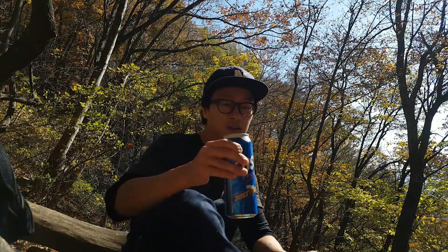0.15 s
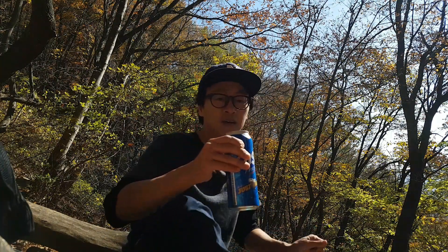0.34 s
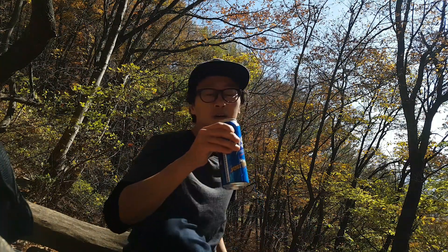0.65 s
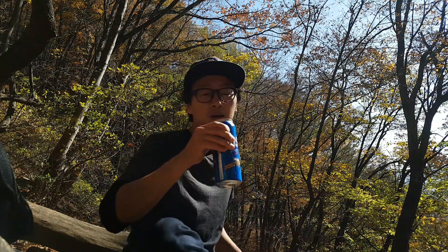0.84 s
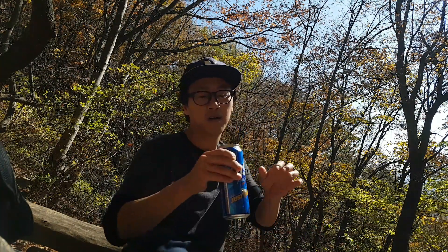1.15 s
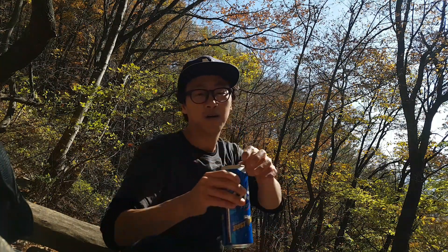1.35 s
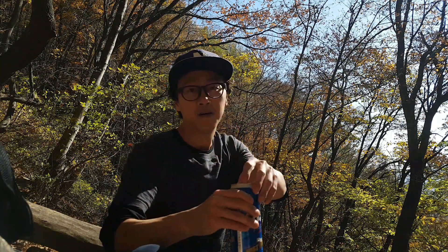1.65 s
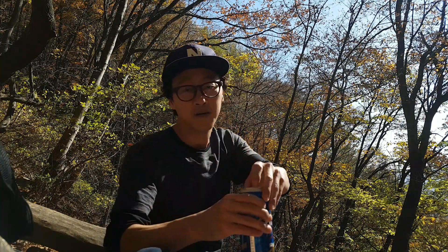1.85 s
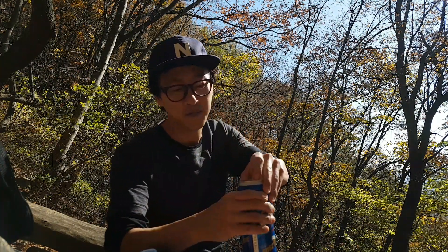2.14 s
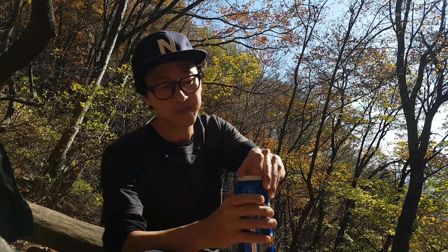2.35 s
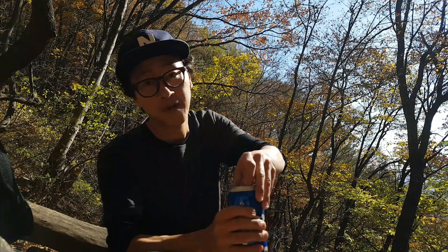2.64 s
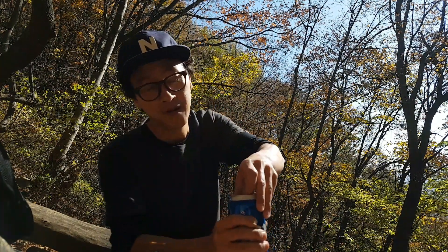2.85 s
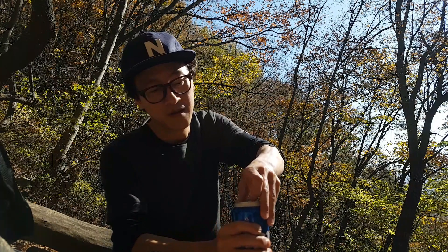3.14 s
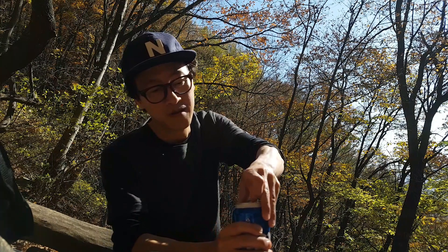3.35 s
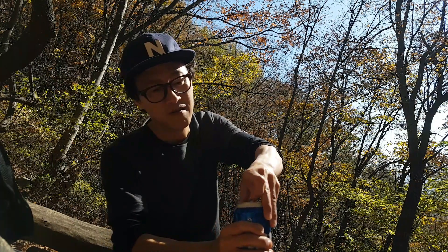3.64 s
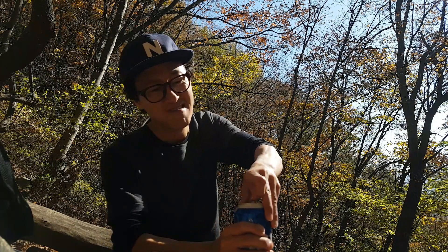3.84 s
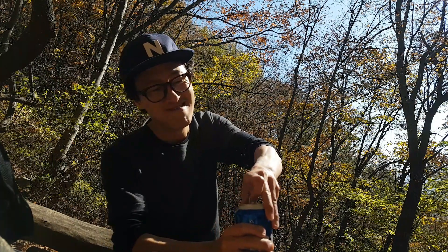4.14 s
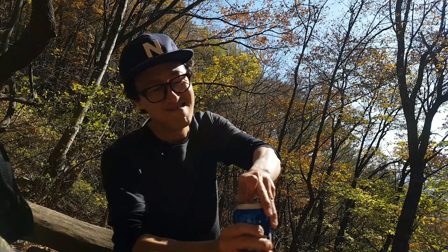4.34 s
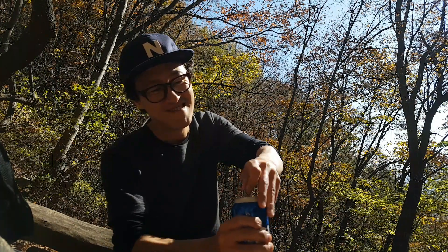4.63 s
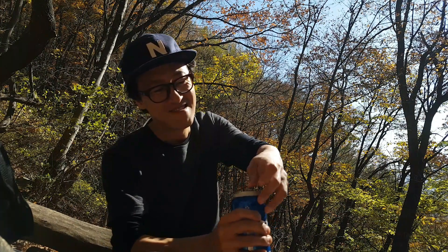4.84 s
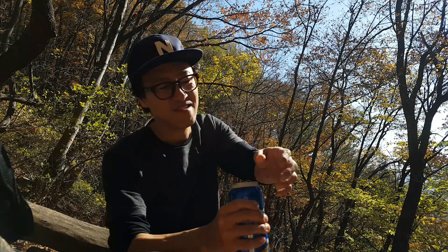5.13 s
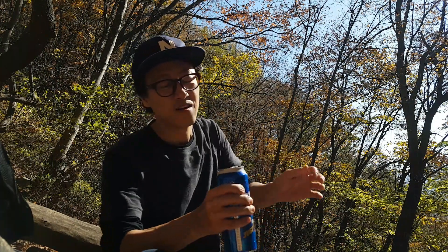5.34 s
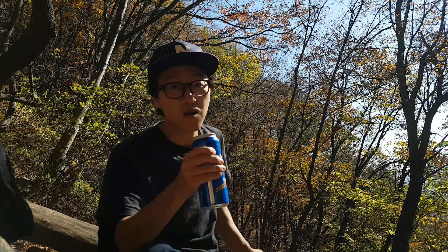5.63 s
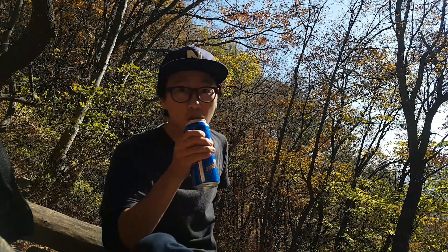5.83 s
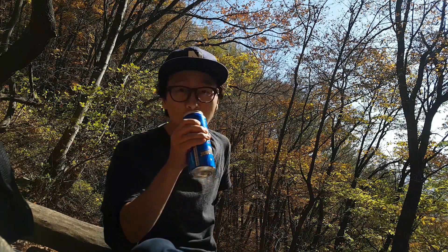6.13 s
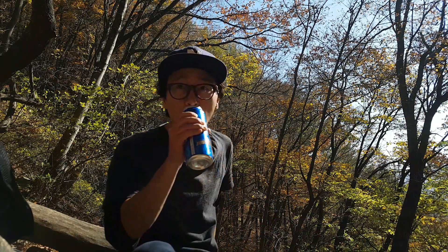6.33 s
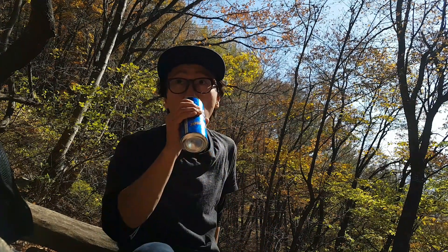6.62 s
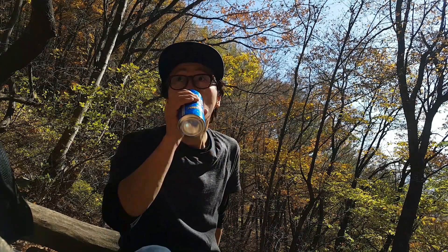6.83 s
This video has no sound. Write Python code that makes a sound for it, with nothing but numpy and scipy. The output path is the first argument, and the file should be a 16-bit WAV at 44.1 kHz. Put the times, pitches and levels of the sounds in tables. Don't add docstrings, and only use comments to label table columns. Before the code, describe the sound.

Close in quiet woods, dry leaves and cloth rustle with small twiggy ticks. Near three seconds a can tab snaps brightly, then snaps again; the seal cracks hard with a spit of gas and the lid folds in almost at once. A short soft hiss fades. Afterward the faint wind and rustle drop in level, then slowly creep back as the recorder recovers.

```python
import sys
import numpy as np
from scipy import signal
from scipy.fft import rfft, irfft, next_fast_len
from scipy.io import wavfile
from scipy.ndimage import uniform_filter1d

SR = 44100
rng = np.random.default_rng(int(sys.argv[2]) if len(sys.argv) > 2 else 0)


def volts(x):
    e = np.asarray(x, float) / 20
    return 10 ** e


def generate_wav(signal):
    frames = np.transpose(np.atleast_2d(signal))
    scaled = np.clip(frames, -1, 1) * 32767
    pcm = np.round(scaled).astype(np.int16)
    wavfile.write(sys.argv[1], SR, pcm)


N = 307850

# frequency [Hz], density [dB per Hz].
BRIGHT_SPECTRUM = [(2940, -30), (5000, -4.5), (5960, -8), (6920, -9.5), (11200, 0.5), (15500, -10.5),
                   (16300, -19), (16500, -59.5)]


def evened(x):
    return x / np.sqrt(np.mean(x ** 2) + 1e-20)


def read(points, hz):
    f, value = np.transpose(points)
    return np.interp(np.log(hz + 1), np.log(f + 1), value)


def add(mix, start_s, sound):
    part = mix[:, round(start_s * SR):][:, :sound.shape[1]]
    part += sound[:, :part.shape[1]]


def coloured(x, points):
    size = next_fast_len(x.shape[1])
    gain = volts(read(points, np.fft.rfftfreq(size, 1 / SR)))
    return evened(irfft(rfft(x, size) * gain, size)[:, :x.shape[1]])


def pair(size, same):
    a, b = rng.standard_normal((2, size))
    same = np.clip(same, 0, 1)
    return np.array([a, same * a + np.sqrt(1 - same ** 2) * b])


def drift(size):
    return evened(uniform_filter1d(uniform_filter1d(rng.standard_normal(N), size), size))


def steep(x, hz, kind):
    return signal.sosfilt(signal.butter(4, hz, kind, fs=SR, output="sos"), x)


def below(x, hz):
    return signal.oaconvolve(x, signal.firwin(255, hz, window=("kaiser", 8), fs=SR)[None], "same")


def recorder_gain():
    # start [s], change [dB], time constant [s].
    ducks = [
        (3.3, -1.5, 0.059),
        (3.97, -1.5, 0.086),
        (4.17, -11, .008),
        (4.19, -10.5, 0.75),
    ]
    rest_db, hold_until_s = 1.18, 4.79
    quick_back_db, quick_back_s, creep_db_per_s = 8, 0.27, 2.1
    t = np.arange(N) / SR
    down_db = sum(db * (1 - np.exp(-np.maximum(t - s, 0) / lag_s)) for s, db, lag_s in ducks)
    free_s = np.maximum(t - hold_until_s, 0)
    back_db = quick_back_db * (1 - np.exp(-free_s / quick_back_s)) + creep_db_per_s * free_s
    return volts(rest_db + down_db + back_db)


def can():
    # frequency [Hz], width [Hz], level [dB].
    lid_shut = [(660, 120, -14), (1306, 124, -3.5), (1500, 120, -0.5), (2000, 350, -14.5),
                (2420, 180, -5.5), (2850, 47, 8), (3830, 30, -3), (4160, 120, -9), (5170, 180, -9.5),
                (6730, 170, -14), (9500, 810, -32)]
    lid_pried = [(610, 120, -17), (1242, 140, -20.5), (1740, 90.7, 5.5), (2120, 220, -19),
                 (2610, 140, -30.5), (3400, 83, -18), (3980, 1400, -24.5), (5200, 150, -14.5),
                 (6150, 300, -19), (8310, 440, -30), (10216, 500, -30), (11400, 360, -37.5)]
    lid_split = [(1245, 110, -19), (1600, 230, 1), (1830, 67, 6.5), (2170, 98, 3), (3300, 200, -6),
                 (4000, 130, -3.5), (4403, 170, 1.5), (5200, 180, 0), (7170, 1400, 0), (8450, 170, -3),
                 (10060, 250, 0), (11000, 170, -7), (14700, 890, -4)]
    lid_open = [(650, 51, -7), (1730, 340, -9.5), (2200, 200, -12.5), (2622, 82, -7), (2960, 243, -5),
                (3447, 250, 3.5), (4450, 260, -8.5), (5230, 220, -5.5), (8350, 170, -6.5), (9600, 660, -9),
                (13300, 390, -11)]
    lid_states = [lid_shut, lid_pried, lid_split, lid_open]
    # time [s], ring [dB], crack
    # noise [dB], crack t60 [s].
    blow_states = [
        [(2.957, -61, -38, 0.067), (2.9613, -1.5, -25.5, 0.01), (2.969, -42, -40, 0.027)],
        [(3.3, -71, -40, 0.15), (3.3045, 4.5, -22, 0.029), (3.3051, -30, -15, 0.021), (3.3098, -40, -35, 0.011),
         (3.3135, -21, -35, 0.0092)],
        [(3.9585, -56, -42, 0.018), (3.9609, -7.5, -18.5, 0.013), (3.9627, 1, -9, 0.02),
         (3.9637, -5.5, -17.5, 0.0076), (3.969, -35.5, -28, 0.03)],
        [(4.1785, -63, -43, .03), (4.1807, -25.5, -26, 0.0042), (4.182, 3.5, -17.5, 0.02),
         (4.1834, -28.5, -28, 0.007), (4.1843, -11, -66, 0.0076), (4.19, -56, -40, 0.075)],
    ]
    # frequency [Hz], density [dB per Hz].
    crack_spectra = [
        [(240, -43), (400, 8), (2800, -13.5), (3530, -5), (6800, -28), (7580, -11), (16500, -26)],
        [(240, -56), (400, -19), (913, -18), (1780, -4.5), (2840, -26.5), (6290, -18), (16500, -46.5)],
        [(240, -58), (400, -43.5), (1780, 2.5), (2840, -7.5), (5220, -3.5), (5820, -17), (7230, -2.5),
         (15000, -12), (16500, -23.5)],
        [(240, -56.5), (430, -32), (650, -6), (1000, -22), (2800, -6.5), (4130, -16), (5800, -10),
         (11500, -12.5), (16500, -29.5)],
    ]
    # contact [s], time until the thumb damps the lid [s], lid springs out +1 or in -1.
    touches = [
        (.00035, .0065, 1),
        (.0005, .0034, 1),
        (.00014, .006, -1),
        (.0002, .0016, -1),
    ]
    out, t = np.zeros((2, N)), np.arange(3000) / SR - .0005
    after = np.maximum(t, 0)
    for modes, blows, spectrum, (contact_s, damped_s, way) in zip(lid_states, blow_states, crack_spectra, touches):
        hz, width_hz, db = np.transpose(modes)[:, :, None]
        detune = 1 + .014 * np.array([-1, 1])[:, None, None] * rng.choice([-1, 1], hz.shape)
        decay = np.exp(-np.pi * width_hz * .8 * after)
        rings = volts(db) * width_hz * decay * np.cos(2 * np.pi * hz * detune * t)
        rise = np.exp(-(np.minimum(t, 0) / contact_s) ** 2)
        thumb = np.where(hz < 800, 1, .09 + np.exp(-(after / damped_s) ** 4))
        ring = (rings * thumb).sum(axis=1) * rise
        ring = way * ring / abs(ring).max()
        for s, ring_db, crack_db, t60_s in blows:
            crack = coloured(pair(len(t), 0.26), spectrum) * volts(crack_db - 60 * after / t60_s)
            add(out, s, volts(ring_db) * ring + crack * rise)
    return steep(out, 420, "high")


def gas():
    # frequency [Hz], density [dB per Hz].
    sigh_spectrum = [(470, -33.5), (800, -4.5), (1100, -22.5), (1260, -10), (1570, -10.5), (3350, 0.5),
                     (6970, -18.5), (10300, -8.5), (14900, -22), (16500, -33)]
    start_s, level_db, t60_s = 4.186, -48.5, 0.45
    out, t = np.zeros((2, N)), np.arange(SR // 2) / SR
    add(out, start_s, coloured(pair(len(t), 0.382), sigh_spectrum) * volts(level_db - 60 * t / t60_s))
    return out


def tick_rows():
    # time [s], peak [dB], pitch [Hz], bright share
    # [dB].
    creaks = [
        (2.9685, -45, 9050, 8),
        (2.986, -31, 4470, -13),
        (4.1091, -31.5, 2280, 0),
        (4.161, -24.5, 2000, -4.5),
        (4.1617, -29.5, 3400, -6),
        (4.171, -36, 1800, 7),
        (4.19, -26.5, 2200, -8),
        (6.595, -56, 2000, -8),
    ]
    # time [s], peak [dB], pitch [Hz], bright share [dB].
    twigs = [(0.0943, -30, 2000, -15), (0.108, -21.5, 2800, -16), (0.1369, -16, 1500, -13),
             (0.2382, -20.5, 1380, -8), (0.3045, -38, 1310, -13), (0.3413, -40, 1680, 6.5),
             (0.405, -43, 1500, 5), (0.5122, -35.5, 1500, -5), (0.5728, -29, 1600, -12),
             (0.6406, -37, 4540, -2), (0.7543, -34.5, 1850, -4), (1.339, -33, 1930, -18),
             (1.932, -21.5, 3320, -4.5), (2.2247, -32, 2340, -4), (2.242, -38, 1100, -32),
             (2.2436, -24, 1900, -36), (2.2467, -26, 1980, -36), (2.253, -27.5, 1900, -26),
             (2.7819, -37.5, 1180, -21), (2.9163, -34.5, 2290, -0.5), (3.792, -35.5, 3360, -17),
             (4.6837, -58, 2510, -7.5), (4.9988, -53, 2250, -0.5), (5.0196, -53.5, 2850, -18),
             (6.1412, -58, 1470, 7.5), (6.9392, -48.5, 2320, -19)]
    # time [s], peak [dB].
    leaf_ticks = [(0.0278, -42), (0.0514, -36.5), (0.2334, -33), (0.3566, -47), (0.5346, -48), (0.55, -53),
                  (0.4604, -49.5), (0.5924, -47), (0.6809, -41.5), (0.826, -42.5), (0.8714, -50),
                  (0.9854, -49), (1.1894, -51), (1.4474, -57), (1.6357, -40), (1.9144, -45), (1.9374, -40),
                  (3.6494, -56), (4.2794, -68), (5.1944, -63), (5.4094, -64), (6.3744, -74)]
    low_hz, high_hz, leaf_bright_db, spread_db = 1200, 3200, 6, 3.5
    lean_db, scatter_db = -7, 2
    leaves = []
    for s, db in leaf_ticks:
        a, b = rng.random(2)
        leaves.append((s, db, low_hz * (high_hz / low_hz) ** a, leaf_bright_db + spread_db * (2 * b - 1)))
    aside = [(*row, lean_db + scatter_db * rng.uniform(-0.65, 1), 1) for row in twigs + leaves]
    return aside + [(*row, 0, 1.1) for row in creaks]


def ticks():
    knock_cycles = 12
    out, t = np.zeros((2, N)), np.arange(500) / SR
    for s, db, hz, bright_db, pan_db, stretch in tick_rows():
        body = [(hz * .3, -24), (hz * .7, -6), (hz, 0), (hz * 1.5, -7), (hz * 2.4, -20), (SR, -70)]
        age = t / stretch
        knock = np.sin(2 * np.pi * hz * t) * volts(-60 * age * hz / knock_cycles)
        crunch = .45 * coloured(pair(len(t), 1.0), body) * volts(-60 * age / .011)
        snap = coloured(pair(len(t), 0.52), BRIGHT_SPECTRUM) * volts(bright_db - 60 * age / .008)
        level = volts(db + pan_db * np.array([[.5], [-.5]]))
        onset = 1 - np.exp(-t / .0004)
        add(out, s, level * (knock + crunch + snap) * onset)
    return out


def grains(points, lumpy_db, same):
    lumps = evened(uniform_filter1d(rng.standard_normal(N), size=60))
    return evened(coloured(pair(N, same), points) * volts(lumpy_db * lumps))


def rustle():
    # time [s], effort [dB].
    motion = [(0, 9), (.3, -1), (.8, -1.5), (.98, -22), (1.12, 3), (1.27, -4), (1.5, 4), (1.75, -1),
              (1.9, 6), (2.06, 7.5), (2.2, -7), (2.4, 2.5), (2.9, -2.5), (3.2, -5), (3.55, -9.5), (4.1, -8),
              (4.6, -17.5), (6.98, -6)]
    # time [s], rise [s], fall [s], dull level [dB], bright level [dB].
    scuffs = [(0.052, 0.043, 0.03, -44.5, -45.5), (.099, 0.004, .014, -39, -48),
              (0.11, 0.022, 0.01, -35, -38), (0.136, 0.036, 0.031, -27.5, -33),
              (0.241, 0.07, 0.038, -40, -45.5), (.31, 0.037, 0.022, -49, -52.5),
              (1.12, 0.16, 0.18, -51, -62), (1.937, 0.0028, 0.054, -46.5, -48),
              (2.224, 0.0053, 0.024, -43.5, -48.5), (2.246, 0.0071, 0.012, -37, -61),
              (2.257, 0.005, 0.019, -42, -71), (3.802, 0.0077, 0.047, -67, -54.5),
              (4.69, 0.0099, 0.019, -78, -65.5), (6.59, 0.022, 0.034, -64, -72)]
    # frequency [Hz], density [dB per Hz].
    dull_spectrum = [(35, -48), (60, -25.5), (210, -20.5), (367, 0), (695, 2), (1170, -6), (1900, -5.5),
                     (3300, -10.5), (4800, -21), (9100, -50), (15400, -120)]
    # frequency [Hz], density [dB per Hz].
    breeze_spectrum = [(12, -30.5), (20, -0.5), (32, -15), (87, -4.5), (156, -23), (366, 1.5), (400, -7),
                       (520, -35), (880, -120)]
    bright_base_db, dull_base_db, breeze_base_db = -61, -59.5, -66
    dull_follows, breeze_follows, wander_db, gust_db = .4, 0.39, -0.5, 5.5
    t, gain = np.arange(N) / SR, recorder_gain()
    effort_db = np.interp(t, *np.transpose(motion))
    flicker = volts(2.2 * evened(uniform_filter1d(rng.standard_normal(N), size=900)))
    bright = volts(bright_base_db + effort_db) * flicker * gain
    dull = volts(dull_base_db + dull_follows * effort_db + wander_db * drift(size=5000)) * gain
    for at, rise_s, fall_s, dull_db, bright_db in scuffs:
        stroke = np.exp(-np.where(t < at, (t - at) / rise_s, (t - at) / fall_s) ** 2 * 2)
        dull = np.hypot(dull, volts(dull_db) * stroke)
        bright = np.hypot(bright, volts(bright_db) * stroke)
    gusts = volts(breeze_base_db + breeze_follows * effort_db + gust_db * drift(size=4000)) * gain
    breeze = gusts * coloured(pair(N, 0.48), breeze_spectrum)
    return dull * grains(dull_spectrum, 3.2, 0.69) + bright * grains(BRIGHT_SPECTRUM, 2.7, 0.18) + breeze


def bumps():
    # time [s], level [dB], pitch [Hz].
    bump_rows = [
        (0.141, -55, 170),
        (2.223, -29, 282),
        (2.251, -34.5, 160),
        (2.96, -31, 316),
        (3.306, -33.5, 400),
        (4.18, -48, 71),
    ]
    out, t = np.zeros((2, N)), np.arange(3000) / SR
    for s, db, hz in bump_rows:
        swing = np.sin(2 * np.pi * hz * t) * np.exp(-hz * 2.0 * t)
        add(out, s, volts(db) * swing * volts([[-2.5], [1.5]]))
    return steep(out, 75, "high")


def woods(x):
    t = np.arange(SR // 4) / SR
    tail = rng.standard_normal((2, len(t))) * volts(-60 * t / 0.049) * (t > .003)
    return signal.fftconvolve(x, tail / np.linalg.norm(tail[0]), axes=1)[:, :N]


def hush():
    # frequency [Hz], density [dB per Hz].
    hush_spectrum = [(12, -27.5), (20, 1), (22, -12), (32, -20), (121, -14), (265, -9.5), (372, -6),
                     (690, -5), (839, -6.5), (1050, -11), (2000, -16), (4400, -20), (5700, -26),
                     (8000, -27.5), (14700, -27), (16500, -33)]
    # frequency [Hz], left-right correlation [-1 to 1].
    likeness = [(60, 0.8), (150, 0.76), (380, 0.55), (950, 0.14), (2380, -0.11), (5980, 0.07),
                (15000, -0.0)]
    level_db, patch_db = -50.5, 1.1
    frames, hz = N // 256 + 5, np.fft.rfftfreq(1024, 1 / SR)
    a, b, c, d, patches = rng.standard_normal((frames, 513, 5)).T
    patches = uniform_filter1d(uniform_filter1d(patches, size=14, axis=0), size=16, axis=1)
    same = np.clip(read(likeness, hz), -1, 1)[:, None]
    left = a + 1j * b
    z = np.array([left, same * left + np.sqrt(1 - same ** 2) * (c + 1j * d)])
    z *= volts(read(hush_spectrum, hz)[:, None] + patch_db * evened(patches))
    wind = signal.istft(z, nperseg=1024, noverlap=768)[1][:, :N]
    return volts(level_db) * evened(wind) * recorder_gain()


def scene():
    near = can()
    quiet = volts(-25) * woods(near) + gas() + ticks() + rustle() + hush() + bumps()
    return near + below(quiet, 15950)


def low_pass(x):
    return signal.sosfilt(signal.butter(12, 16980, fs=SR, output="sos"), x)


def record(dry):
    # start [s], end [s], lost above [Hz].
    treble_gaps = [
        (2.941, 2.956, 1800),
        (3.29, 3.298, 660),
        (3.944, 3.955, 4800),
        (4.178, 4.176, 1500),
    ]
    offset = -0.0012
    t, out = np.arange(N) / SR, dry.copy()
    for start, end, hz in treble_gaps:
        span = slice(round((start - .01) * SR), round((end + .01) * SR))
        inside = abs(t[span] - (start + end) / 2) < (end - start) / 2
        gap = uniform_filter1d(1. * inside, size=110)
        out[:, span] = gap * below(dry[:, span], hz) + (1 - gap) * dry[:, span]
    overloaded = out / (1 + (out / 1.1) ** 4) ** .25
    return low_pass(below(overloaded, 16750) + offset * recorder_gain())


dry = scene()
out = record(dry)
generate_wav(out)
```